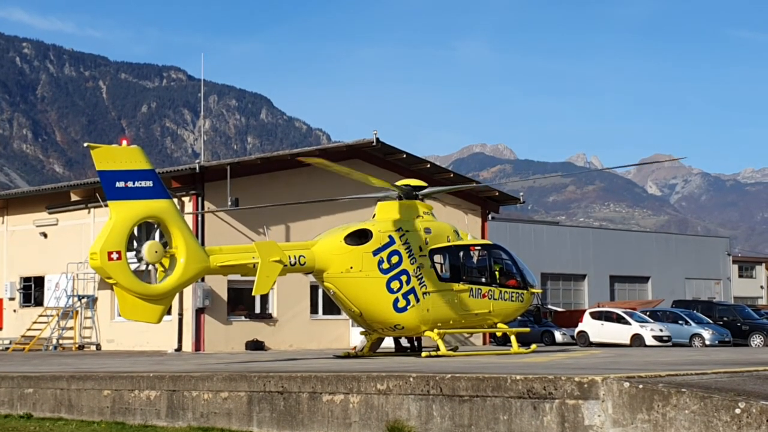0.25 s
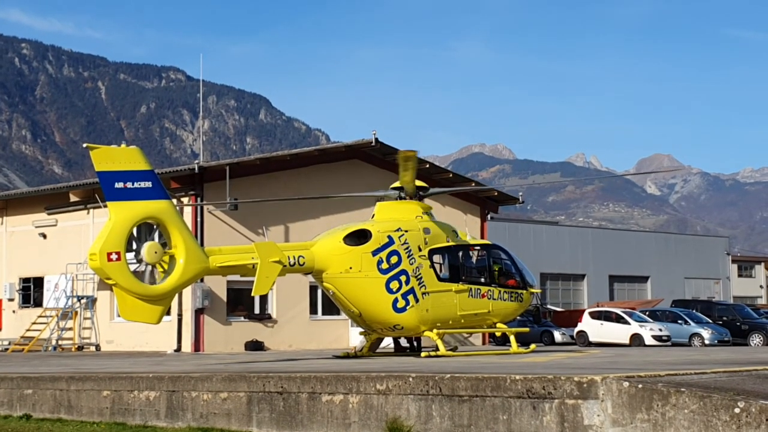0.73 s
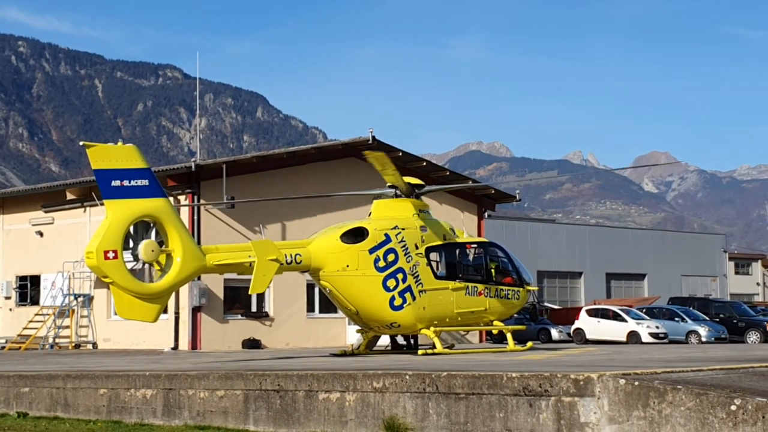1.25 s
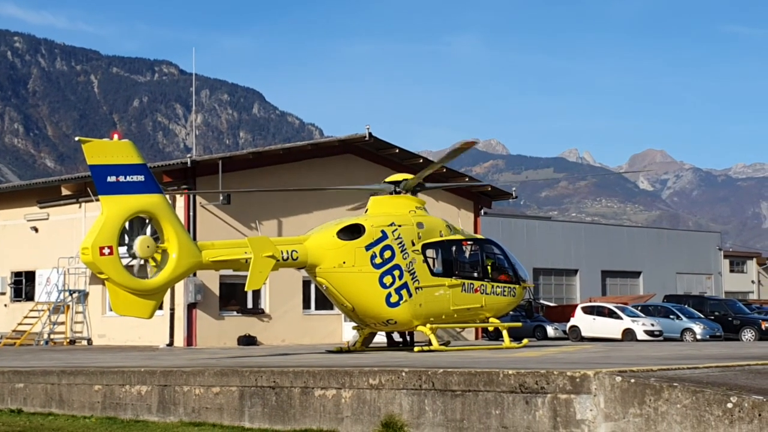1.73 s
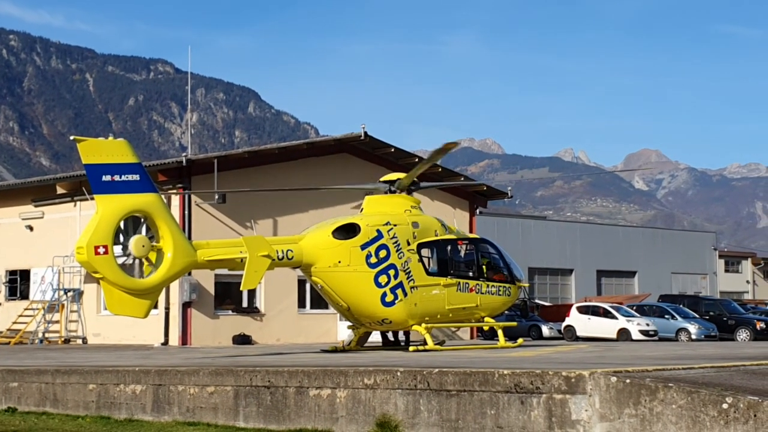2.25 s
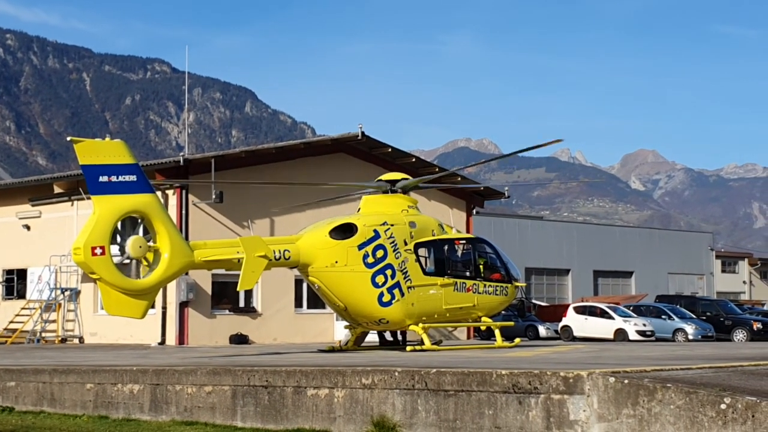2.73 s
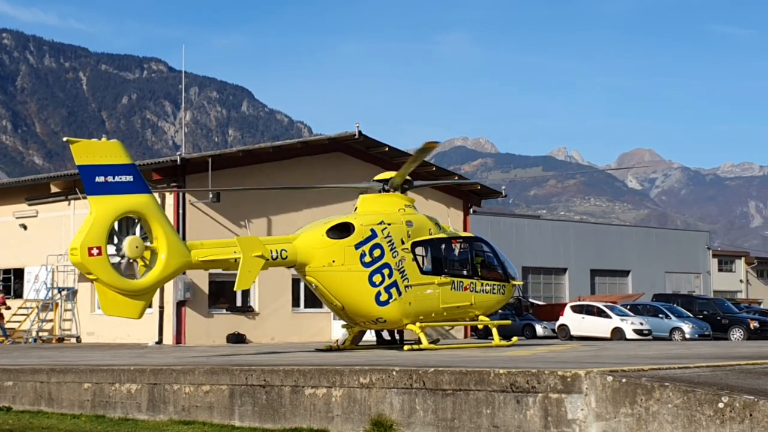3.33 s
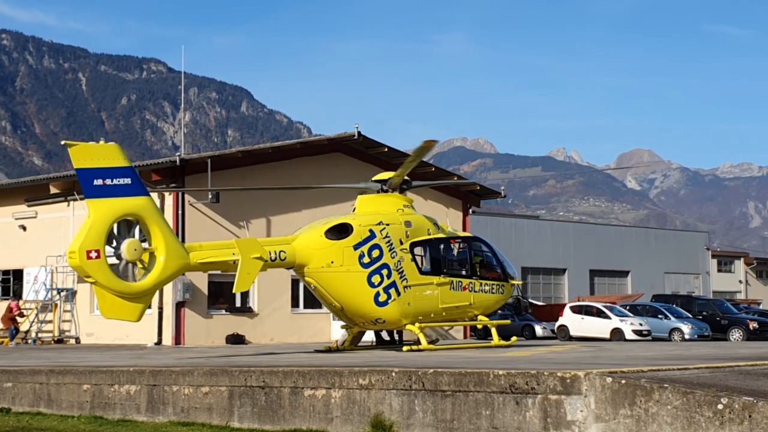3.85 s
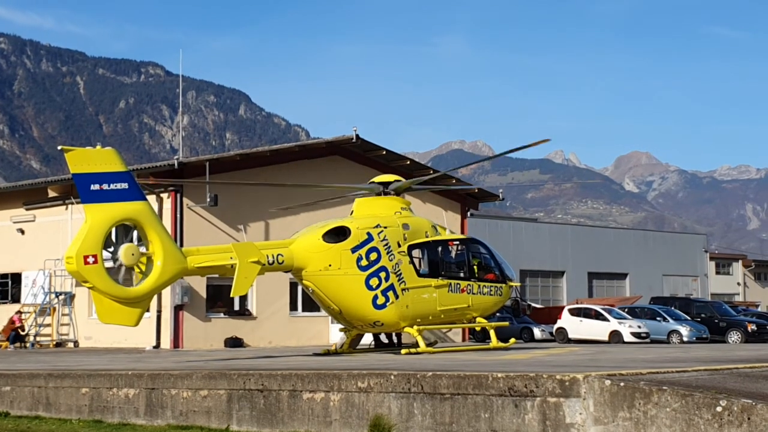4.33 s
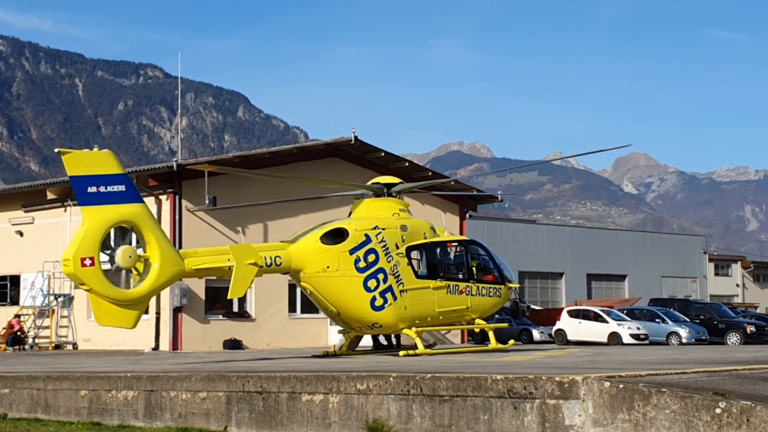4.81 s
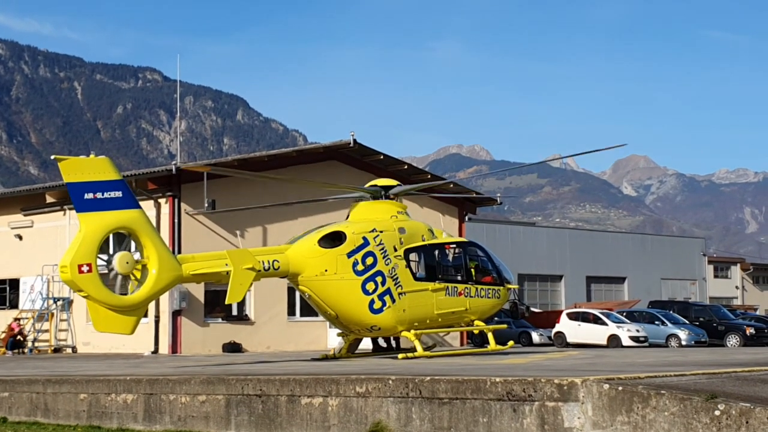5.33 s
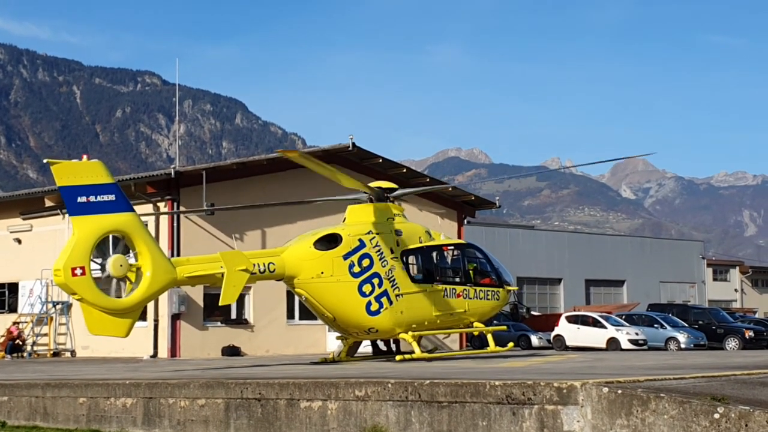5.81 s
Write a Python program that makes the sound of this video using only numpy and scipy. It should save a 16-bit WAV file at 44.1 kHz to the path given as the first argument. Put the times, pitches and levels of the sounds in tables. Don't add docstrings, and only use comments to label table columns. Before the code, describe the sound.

A light twin-turbine helicopter runs on a concrete pad, heard outdoors across an open apron by a small stereo recorder. Throughout, the shrouded tail fan sings a nearly fixed chord, strongest around 470 to 600 Hz, with higher whining tones flickering through moving air. Beneath it is a broad rushing roar, with bright hiss above 8 kHz, pulsing about 26 times a second with the main blades. From 0 to 1.5 seconds strong low gusts flutter on the right, with a few dull pops left. From 1.5 to 2.6 it is calmer, with faint slaps near 2.3. Gusts return at 2.65 and 3.7 to 4.1, while the fan hum thins. A fuzzy high whistle swells around 4.5 to 5. From 4.94 to 5.9 crisp blade slaps rattle rapidly, with heavy buffeting right and crowded pops left from 5.3. It ends still running.

```python
import sys
import numpy as np
from scipy import signal
from scipy.fft import rfft, irfft, next_fast_len
from scipy.io import wavfile
from scipy.ndimage import uniform_filter1d, map_coordinates

SR = 44100
rng = np.random.default_rng(int(sys.argv[2]) if len(sys.argv) > 2 else 0)


def transcribe(u):
    v = np.clip(np.atleast_2d(u).T, -1, 1)
    q = np.round(v * 32767).astype(np.int16)
    wavfile.write(sys.argv[1], SR, q)


def how_loud(loudness_db):
    steps = np.asarray(loudness_db, float) / 20
    return 10 ** steps


N = 267687
T = np.arange(N) / SR

# frequency [Hz], level [dB per Hz].
LEFT_COLOUR = [(120, -44), (230, -20.5), (300, -8.0), (430, -1.0), (640, 3.0), (850, -7.5), (980, -15.5),
               (1120, -10.0), (1500, -7.5), (2100, -11.5), (2600, -9.0), (3300, -8.0), (4100, -12.5),
               (5000, -23.0), (6700, -32.0), (7400, -51.5), (8000, -88)]
# time [s], strength [dB], brightness [dB].
AIR_DRIFT = [(0.0, -45, 3.5), (0.56, -42.5, 1), (0.78, -49, 2), (0.88, -40.5, -4), (1.05, -44.5, 2.5),
             (1.18, -42.5, 0.5), (1.3, -49, -1.5), (1.93, -47.5, -4), (1.98, -57, -3), (2.47, -56.5, -4.5),
             (2.84, -39, 2), (3.14, -55, -3), (3.5, -41.5, 1), (3.7, -48, 2), (4.67, -46.5, 3),
             (4.78, -54, -1.5), (5.49, -46, 1), (6.07, -47, -4)]
AIR_MEAN_DB = -48


def unit(x):
    return x / np.sqrt(np.mean(x ** 2) + 1e-20)


def along(points, hz):
    f, v = np.transpose(points)
    return np.interp(np.log(hz + 1), np.log(f + 1), v)


def curves(rows):
    s, *cols = np.transpose(rows)
    return [np.interp(T, s, c) for c in cols]


def wobble(rate):
    coarse = T[::64]
    knots = rng.standard_normal(int(N * rate / SR) + 4)
    return np.interp(T, coarse, map_coordinates(knots, [coarse * rate]))


def filtered(x, response):
    m = next_fast_len(N + 8192)
    return irfft(rfft(x, m) * response(np.fft.rfftfreq(m, 1 / SR)), m)[..., :N]


def coloured(points):
    return unit(filtered(rng.standard_normal(N), lambda hz: how_loud(along(points, hz))))


def patchy(patchy_db):
    z = signal.stft(rng.standard_normal(N), nperseg=512)[2]
    field = uniform_filter1d(rng.standard_normal(z.shape), size=6, axis=0)
    field = uniform_filter1d(field, size=12, axis=1)
    return signal.istft(z * how_loud(patchy_db * unit(field)), nperseg=512)[1][:N]


def fan():
    # shaft order, level [dB rms at the left port].
    orders = [(8, -44), (9, -59), (10, -44.2), (12, -54), (14, -54.5), (18, -57), (20, -61), (24, -50),
              (28, -64), (32, -56), (36, -66), (38, -60.5), (40, -68), (42, -60.5), (44, -59.5), (46, -67),
              (48, -62), (56, -57), (58, -70), (64, -65)]
    # time [s], then steady, wake-cutting, tip loading and thrust levels [dB].
    blade_load = [(0, -47.5, -68, -55, -49), (.35, -48, -53, -55.5, -49), (.72, -50.5, -51, -55.5, -52),
                  (.85, -50.5, -45.5, -64.5, -51), (1.0, -49, -58.5, -63.5, -50.5),
                  (1.2, -48.5, -52, -55.5, -49.5), (1.33, -48, -65, -78, -49.5), (1.6, -47, -57, -70, -45),
                  (1.92, -53, -58.5, -63, -50), (2.05, -53, -72, -73, -50), (2.45, -59, -67, -70, -53.5),
                  (2.87, -54.5, -55, -52, -54.5), (3.2, -56.5, -74, -75, -53),
                  (3.47, -54, -52.5, -57.5, -52.5), (4.0, -57, -73, -74, -53),
                  (4.66, -65, -56.5, -58, -55.5), (4.85, -69, -76, -72, -55.5),
                  (6.07, -58, -72, -69, -50.5)]
    full_loads_db = (-47, -51, -55, -48)
    # trim [dB], then share of steady,
    # wake-cutting, tip loading, thrust and air path [dB per dB], and drift [dB per s].
    follow_rows = [(1, 0, 0.02, 0.061, 0.92, 0.065, 0), (2, 1, 0.033, 0, 0.073, 0.032, 0.12),
                   (1, 0.22, 0.84, 0.05, 0, 0.11, 0.2), (2.5, 0, 0.0086, 0.89, 0.088, 0.19, 0.5),
                   (1, 0.36, 0.052, 0.5, 0, 1, -0.36)]
    controls = [c - full_db for c, full_db in zip(curves(blade_load), full_loads_db)]
    controls += [air_path()[0], T]
    loads = [trim_db + np.dot(follows, controls) for trim_db, *follows in follow_rows]
    angle, sound = turns(), np.zeros(N)
    for order, db in orders:
        load_db = loads[np.searchsorted([9, 17, 30, 36], order, side="right")]
        scatter = np.sqrt(order / 30) * min(1, order / 11.5)
        flicker_db = min(scatter, 1) * (1.2 * wobble(12) + 2.6 * wobble(40)) + 1.3 * wobble(7)
        if order == 32:
            flicker_db = flicker_db + 1.5 * wobble(16)
        phase = (0.25 + 1.1 * scatter) * wobble(6) + 1.08 * scatter ** 2 * wobble(30)
        phase = phase + rng.uniform(0, 2 * np.pi)
        sound += how_loud(db + 3.5 + load_db + flicker_db) * np.sin(order * angle + phase)
    return sound


def turns():
    # time [s], turns a second [Hz].
    shaft = [(0, 59.29), (1.7, 59.275), (2.8, 59.5), (6.07, 59.525)]
    return 2 * np.pi * np.cumsum(curves(shaft)[0]) / SR


def chop(depth, lag, sharp):
    blades_per_turn, start_rad = 1 / 2.2675, 2.0
    swell = np.exp(sharp * (np.cos(blades_per_turn * turns() + start_rad - lag) - 1))
    return 1 + depth * (swell / swell.mean() - 1) * how_loud(7.14 * wobble(15))


def air_path():
    # time [s], strength [dB], half length [s], brightness [dB].
    lenses = [(0.058, -1.5, .025, -2), (2.071, 5, 0.076, 6.5), (2.62, 4, 0.068, 1.5),
              (2.988, 1.5, 0.088, -4.5), (3.383, 2, 0.033, -3), (3.63, 0, 0.078, -5), (3.85, -2, 0.04, 2),
              (3.993, -4, 0.12, 6.5), (4.18, 6, 0.025, 2.5), (4.474, 1.5, 0.082, 4.5),
              (4.618, -6, 0.012, -2), (4.858, 4, 0.041, 3), (4.99, -2, 0.054, -1), (5.602, -2, 0.019, 4),
              (5.656, 3, 0.05, 0.5), (5.92, -4, 0.08, -2), (5.993, -1.5, 0.04, 1.5), (1.55, 0, 0.21, 3),
              (4.016, -1, 0.04, 1.5), (1.234, 1, 0.023, 4), (4.33, -5, 0.11, 4.5), (2.282, -1, 0.024, 2)]
    s, db, half, tilt_db = np.transpose(lenses)[..., None]
    coarse = T[::64]
    lens = np.exp(-((coarse - s) / half) ** 2)
    air_db, bright_db = curves(AIR_DRIFT)
    air_db = air_db - AIR_MEAN_DB + np.interp(T, coarse, (db * lens).sum(0))
    return air_db, bright_db + np.interp(T, coarse, (tilt_db * lens).sum(0))


def roar():
    # level [dB], share of air path and of brightness
    # [dB per dB], own gusts [dB], patches [dB].
    bands = [(-53, 0.14, 0.01, 0.5, 2), (-51, 0.95, -0.87, 0.3, 3), (-50.5, 0.81, 0.87, 0.3, 3),
             (-66, 0.38, 0.4, -0.6, 2.5)]
    air_db, bright_db = air_path()
    levels = [db + a * air_db + b * bright_db + own_db * wobble(11) for db, a, b, own_db, _ in bands]
    levels[0] = levels[0] - 0.24 * (T - T.mean())

    def above(hz, edge_hz):
        return 1 / (1 + (edge_hz / (hz + 1)) ** 8)

    shares = (lambda hz: 1 - above(hz, 1050),
              lambda hz: above(hz, 896) - above(hz, 2420),
              lambda hz: above(hz, 1690) - above(hz, 4900),
              lambda hz: above(hz, 5070))
    sound = np.zeros((2, N))
    for level_db, share, trim_db, row in zip(levels, shares, (6.7, 0.067, 0.14, 7.16), bands):
        air = np.array([patchy(row[-1]), patchy(row[-1])])
        band = filtered(air, lambda hz: np.sqrt(np.abs(share(hz))) * how_loud(along(LEFT_COLOUR, hz)))
        sound += how_loud(level_db + trim_db) * unit(band)
    flutter = how_loud(0.18 * wobble(14) + 0.81 * wobble(30))
    swish = chop(0.13 - 0.009 * T, lag=0.32, sharp=1.0)
    return sound * flutter * swish


def slaps():
    # peak [dB], crack centre [Hz], thud [dB].
    run = [(-37, 1900, -45), (-38, 1900, -43), (-45, 2000, -43), (-39, 1800, -44), (-35.5, 2200, -41),
           (-31, 2100, -39), (-31.5, 3400, -39), (-35, 3100, -38), (-34, 2200, -39), (-31.5, 1700, -35),
           (-30.5, 1900, -36), (-30, 1800, -40), (-32, 1800, -36), (-31.5, 2400, -33), (-32.5, 2400, -33),
           (-39, 1700, -32), (-40, 1900, -34), (-37.5, 1900, -37), (-35, 1600, -38), (-36, 1600, -34),
           (-31.5, 2200, -42), (-34, 1500, -42), (-33.5, 1150, -41), (-34, 1200, -39), (-36, 1600, -42),
           (-46, 1300, -39)]
    # time [s], peak [dB], crack centre [Hz], thud [dB].
    strays = [
        (2.246, -44, 1500, -44),
        (2.280, -41, 1500, -40),
        (2.322, -45, 1300, -46),
        (2.356, -40, 1700, -45),
        (2.395, -44, 1200, -47),
        (2.432, -44, 1300, -48),
        (4.519, -41, 1700, -43),
        (4.557, -41, 1700, -43),
        (4.748, -43, 1700, -44),
        (4.786, -39, 1800, -41),
    ]
    first_s, gap_s = 4.9381, .038212
    shock_s, shock_rise_s = .0011, .00015
    thud_hz, swoop_hz, swoop_s = 600, 330, .003
    skirt, width = .2, .48
    tail, tail_t60_s = .2, .04
    sound, t = np.zeros(N + SR), np.arange(1024) / SR
    grid = np.fft.rfftfreq(len(t), 1 / SR)
    late = np.exp(-1j * 2.54 * np.log(grid / 4000 + 0.076))
    rows = [(first_s + gap_s * k, *row) for k, row in enumerate(run)] + strays
    for (s, db, hz, thud_db), noise in zip(rows, rng.standard_normal((len(rows), len(t)))):
        burst = np.exp(-((t - .0016) / 0.00089) ** 2) + tail * (t > .002) * how_loud(-60 * t / tail_t60_s)
        spectrum = rfft(noise * burst)
        fronts = spectrum / np.sqrt(np.abs(uniform_filter1d(np.abs(spectrum) ** 2, size=14)))
        colour = skirt + 1 / (1 + (np.log(grid / hz + 1e-3) / width) ** 2)
        colour = colour * how_loud(.9 * along(LEFT_COLOUR, grid)) * np.clip(grid / 900, 0, 1) ** 2
        crack = irfft(fronts * colour * late) * np.clip((t - shock_s) / shock_rise_s, 0, 1)
        cycles = (1 + 0.13 * noise[0]) * (thud_hz * t - swoop_hz * swoop_s * np.exp(-t / swoop_s))
        thud = np.sin(2 * np.pi * cycles) * (t / 0.0035) ** 2 * np.exp(2 - 2 * t / 0.0028)
        slap = how_loud(db + 3.0) * crack / np.abs(crack).max() + how_loud(thud_db + 1.7) * thud
        sound[round((s - .0001) * SR):][:len(t)] += slap
    return sound[:N]


def hiss():
    # frequency [Hz], level [dB per Hz].
    left_colour = [(7000, -60), (7500, -30), (7950, -9.5), (8200, -8.5), (8900, -10), (9400, -4.5),
                   (10000, 4), (11500, 2.5), (12800, -1), (14300, 6), (15600, -3.5)]
    right_colour = [(7000, -60), (7500, -63.0), (8000, -82.0), (8500, -77.0), (9500, -85.0), (10500, -58.0),
                    (11600, -66.0), (12900, -25.0), (13200, -7.0), (14300, 1.0), (15600, -4.0)]
    # start [s], end [s], rise [dB], attack [s], release [s].
    start, end, rise_db, attack, release = (4.5, 5.06, 17.3, 0.25, .8)
    air_db = curves(AIR_DRIFT)[0] - AIR_MEAN_DB
    noise = np.array([patchy(0.75), patchy(1.1)])
    pair = unit(filtered(noise, lambda hz: how_loud([along(left_colour, hz), along(right_colour, hz)])))
    edge = filtered(pair, lambda hz: 1 / (1 + (hz / 9300) ** 40))
    pair = pair + (how_loud(0.32 * air_db) - 1) * edge
    right_db = 0.16 * air_db - 0.3 * (T - T.mean())
    depth = 0.24 - 0.006 * air_db
    gains = [chop(0.27 * depth, lag=-0.59, sharp=0.8),
             how_loud(right_db) * chop(0.87 * depth, lag=.01, sharp=1.2)]
    level_db = -60 + 0.15 * air_db + 0.6 * wobble(13)
    surge = np.clip(np.minimum((T - start) / attack, 1 + (end - T) / release), 0, 1)
    whistle_db = -91 + 0.71 * air_db + rise_db * surge
    whistle = filtered(rng.standard_normal((2, N)), lambda hz: np.exp(-((hz - 8520) / 330) ** 2))
    return how_loud(level_db) * pair * gains + how_loud(whistle_db + np.array([[4.5], [-19]])) * unit(whistle)


def downwash():
    # time [s], peak [dB], rise over the last
    # 10 dB [s], eddy rate [Hz].
    gust_rows = [(0.108, -32.0, 0.056, 91), (0.258, -30.0, 0.017, 91), (0.365, -31.5, 0.029, 74),
                 (0.683, -32.0, 0.236, 83), (0.81, -26.5, 0.033, 92), (0.937, -43.5, 0.015, 87),
                 (1.075, -26.0, 0.039, 98), (1.221, -32.5, 0.041, 79), (1.323, -28.0, 0.018, 80),
                 (1.39, -31.5, 0.02, 58), (1.467, -41.5, 0.11, 55), (1.599, -44.0, 0.016, 70),
                 (1.707, -43.5, 0.079, 81), (1.792, -43.5, 0.029, 55), (1.868, -41.0, 0.023, 62),
                 (1.936, -46.0, 0.033, 59), (1.998, -48.5, 0.057, 97), (2.102, -39.0, 0.031, 91),
                 (2.262, -58.5, 0.089, 65), (2.392, -54.0, 0.048, 49), (2.51, -50.0, 0.039, 56),
                 (2.705, -33.5, 0.025, 84), (2.857, -38.5, 0.065, 87), (2.905, -37.5, 0.015, 91),
                 (2.973, -36.5, 0.029, 104), (3.052, -39.5, 0.035, 84), (3.135, -43.0, 0.024, 95),
                 (3.219, -37.5, 0.031, 54), (3.326, -35.0, 0.015, 64), (3.38, -42.0, 0.067, 66),
                 (3.548, -50.0, 0.058, 65), (3.746, -29.0, 0.028, 110), (3.85, -27.5, 0.051, 91),
                 (3.981, -33.0, 0.015, 102), (4.076, -28, 0.015, 64), (4.23, -39.0, 0.045, 72),
                 (4.382, -43.0, 0.046, 69), (4.588, -38.5, 0.049, 74), (4.661, -32.5, 0.024, 73),
                 (4.752, -33.0, 0.057, 110), (4.83, -36, 0.015, 57), (4.916, -34.5, 0.051, 99),
                 (5.016, -32.0, 0.029, 95), (5.112, -45.0, 0.059, 76), (5.233, -53.0, 0.05, 60),
                 (5.418, -29.0, 0.071, 87), (5.518, -24.5, 0.023, 92), (5.702, -26.5, 0.06, 108),
                 (5.892, -31.5, 0.065, 69), (6.054, -50.5, 0.015, 59),
                 (0.703, -23, .012, 84), (0.802, -24, .01, 92), (0.868, -31, .014, 72), (0.05, -37, .015, 95),
              (1.068, -27, .01, 110), (1.248, -35, .012, 150), (3.712, -39, .015, 150),
              (4.073, -28, .01, 64), (5.342, -35, .009, 140), (5.39, -29, .012, 135), (0.48, -35, .03, 60),
              (3.28, -41, .04, 42), (4.87, -35, .025, 42), (1.55, -43, .04, 110), (5.762, -30, .014, 105),
              (5.925, -31, .014, 55), (4.575, -41, .015, 120), (2.655, -26.5, .012, 68),
              (2.61, -40, .02, 80)]
    fall_over_rise, calm_db = 1.3, -59
    s, db, rise, hz = np.transpose(gust_rows)[..., None]
    coarse = T[::128]
    away = np.maximum((s - coarse) / rise, (coarse - s) / (fall_over_rise * rise))
    power = how_loud(2 * (db - 10 * away)) + 1e-20
    level_db = 10 * np.log10(power.sum(0) + how_loud(2 * calm_db))
    rate_hz = (power * hz).sum(0) / power.sum(0)
    return np.interp(T, coarse, level_db), np.interp(T, coarse, rate_hz)


def buffet(level_db, rate_hz):
    # frequency [Hz], level [dB].
    rumble_colour = [(15, -31), (30, -4.5), (48, 4.5), (95, -7.5), (130, -7.5), (160, -13), (220, -29),
                     (400, -46), (900, -65), (2500, -130)]
    jostle = wobble(85) + 1j * wobble(85)
    cycles = np.cumsum(1.04 * rate_hz) / SR
    shedding = np.real(jostle / (np.abs(jostle) + 0.7) ** 0.37 * np.exp(2j * np.pi * cycles))
    shedding = filtered(shedding, lambda hz: 1 / (1 + (hz / 160) ** 6))
    quicker_hz = rate_hz - 80
    eddies = unit(unit(shedding) + 0.58 * how_loud(-0.1756 * quicker_hz) * coloured(rumble_colour))
    span = round(.04 * SR)
    strength = uniform_filter1d(uniform_filter1d(eddies ** 2, size=span), size=span)
    gusts = how_loud(level_db) * eddies / np.sqrt(np.abs(strength) + 0.038)
    gusts = gusts / (1 + np.abs(gusts / .15) ** 4) ** (1 / 4)
    gusts = filtered(gusts, lambda hz: 1 / (1 + (hz / 500) ** 4))
    spill_colour = [(90, -18), (170, 3.5), (350, -5), (700, -57), (1200, -52), (2500, -130)]
    spill = unit(filtered(patchy(1.9), lambda hz: how_loud(along(spill_colour, hz))))
    spill_db = level_db - 18.5 + 0.1247 * quicker_hz + 0.92 * (T - T.mean()) + 2.8 * wobble(25)
    spill = how_loud(spill_db) * spill + how_loud(-69) * spill[::-1]
    swell_db = uniform_filter1d(level_db, size=round(.14 * SR)) + 36.5
    heave = coloured([(12, -30), (28, 0), (50, 1), (80, -24), (200, -120)])
    return gusts + spill + how_loud(-47.5 + 0.79 * swell_db) * heave


def snaps():
    # time [s], peak [dB].
    steps = [
        (0.256, -38),
        (2.642, -33),
        (3.318, -42),
        (4.068, -33),
        (4.79, -40),
        (1.24, -40),
    ]
    sound, u = np.zeros(N + SR), np.arange(-512, 512) / SR / .001
    for s, db in steps:
        sound[round(s * SR) - 512:][:len(u)] += how_loud(db) * (1 - u ** 2) * np.exp(-u ** 2 / 2)
    return sound[:N]


def pops(gusts, level_db):
    # time [s], level [dB], pitch [Hz], length [s].
    bursts = [(0.264, -43, 87, 0.018), (0.704, -34, 120, 0.017), (0.81, -32, 113, 0.019),
              (0.842, -40, 79, 0.014), (1.065, -35, 165, 0.009), (1.11, -40, 194, 0.015),
              (2.66, -40, 75, 0.013), (2.72, -53, 60, .01), (3.335, -52, 60, .01), (3.745, -51, 150, 0.012),
              (3.8, -44, 149, 0.008), (3.838, -44, 190, .008), (3.86, -37, 70, 0.016),
              (3.897, -46, 70, .008), (4.08, -30, 62, 0.019), (4.928, -43, 218, 0.013),
              (5.018, -46, 174, 0.01), (5.33, -46, 170, 0.012), (5.358, -40, 155, 0.014),
              (5.384, -29, 161, 0.01), (5.429, -33, 150, 0.022), (5.459, -42, 171, 0.017),
              (5.507, -34, 152, 0.018), (5.54, -36, 70, 0.016), (5.664, -28, 99, 0.019),
              (5.711, -25.5, 118, 0.012), (5.744, -41, 224, 0.012), (5.772, -29, 105, 0.022),
              (5.803, -38, 80, 0.012), (5.86, -31, 74, 0.019), (5.882, -36, 96, 0.009),
              (5.923, -26, 92, 0.011)]
    # frequency [Hz], level [dB].
    rattle_colour = [(150, -23), (300, 0), (430, -6), (650, -8), (1500, -120)]
    (sound, gate, quick), t = np.zeros((3, N + SR)), np.arange(-2048, 2048) / SR
    for (s, db, hz, length), phase in zip(bursts, rng.uniform(0, 2 * np.pi, len(bursts))):
        at = slice(round(s * SR) - len(t) // 2, round(s * SR) + len(t) // 2)
        swing = np.cos(2 * np.pi * 0.91 * hz * t + phase)
        sound[at] += how_loud(db + 0.5) * swing * np.exp(-(t / (0.71 * length)) ** 2)
        gate[at] += how_loud(db - 12.5) * np.exp(-(t / (0.75 * length)) ** 4)
        quick[at] += how_loud(db - 10.0) * (hz / 147) ** 2 * np.exp(-(t / length) ** 2)
    swings = filtered(sound[:N], lambda hz: hz ** 2 / (hz ** 2 + 22 ** 2))
    crowding = uniform_filter1d(quick[:N], size=round(.12 * SR))
    rattle = how_loud(3) * crowding * coloured(rattle_colour)
    shared = filtered(gusts, lambda hz: 1j + 0 * hz) / how_loud(level_db)
    edge = coloured([(40, 1.0), (180, 7.0), (300, 0.0), (450, -6.0), (700, -12), (1500, -120)])
    rumble = coloured([(30, -22), (70, -20), (130, 4), (220, 10), (400, -30), (1500, -120)])
    rumble_db = 0.21 * (level_db + 34) - 77.5
    return swings + rattle + gate[:N] * (shared + 1.3 * edge) + how_loud(rumble_db) * rumble


def scene():
    # frequency [Hz], level difference [dB].
    right_over_left = [(430, -11), (640, -13.5), (850, -8.5), (980, -3.5), (1150, -4.5), (1450, -3),
                       (2100, -7.5), (2600, -7), (3300, -6), (4000, 0.5), (5000, 1), (6000, -7), (6800, -4),
                       (7400, -15)]
    # frequency [Hz], lead [rad].
    left_leads = [(450, -1.3), (620, -1.4), (750, -2.2), (900, -3.1), (970, -2.9), (1050, -1.0),
                  (1180, -1.4), (1400, -0.1), (2050, 0.4), (2600, 0.2), (3700, -0.3), (4300, 1.4),
                  (5200, 2.7), (6000, 2.5)]
    # frequency [Hz], likeness [0-1].
    likeness = [(350, .2), (470, .92), (880, .92), (990, .45), (1090, .93), (2000, .93), (3300, .88),
                (4200, .65), (6000, .35), (7000, .1)]

    def port(hz):
        return how_loud(along(right_over_left, hz)) * np.exp(-1j * along(left_leads, hz))

    def alike(hz):
        return np.clip(along(likeness, hz), 0, 1)

    points = fan() + slaps()
    direct, diffuse = roar()
    level_db, rate_hz = downwash()
    gusts = buffet(level_db, rate_hz)
    left = points + direct + pops(gusts, level_db)
    right = filtered(points, port) + filtered(direct, lambda hz: port(hz) * alike(hz))
    right = right + filtered(diffuse, lambda hz: port(hz) * np.sqrt(1 - alike(hz) ** 2))
    return np.array([left, right + gusts + snaps()]) + hiss()


def top_cut(x):
    return signal.sosfilt(signal.butter(12, 15770, fs=SR, output="sos"), x)


def record(dry):
    return top_cut(filtered(dry, lambda hz: hz < 15770))


dry = scene()
out = record(dry)
transcribe(out)
```